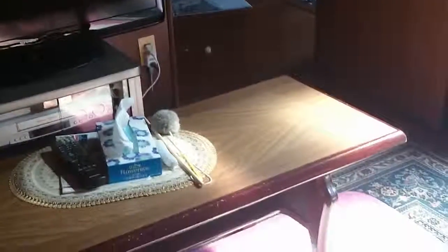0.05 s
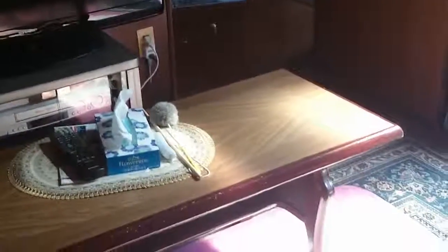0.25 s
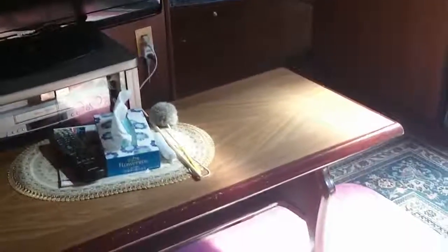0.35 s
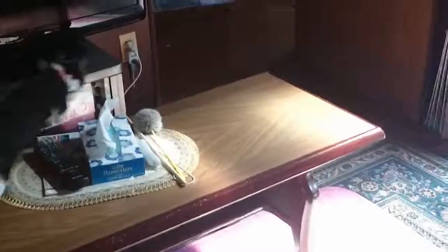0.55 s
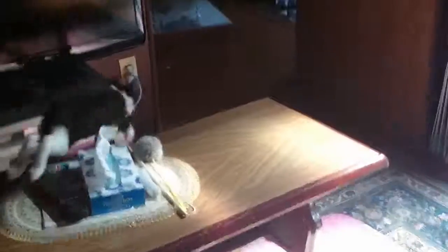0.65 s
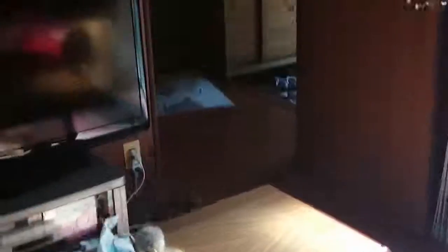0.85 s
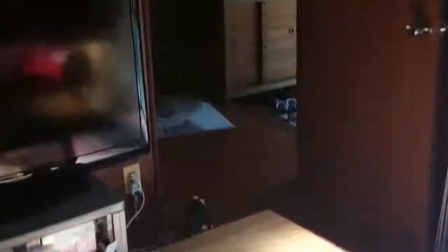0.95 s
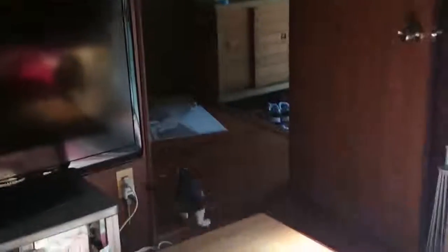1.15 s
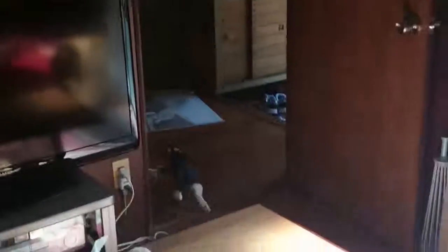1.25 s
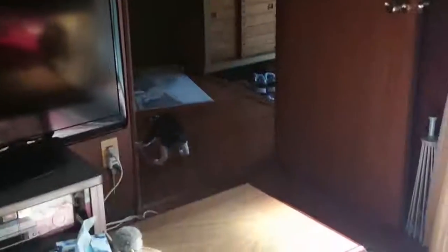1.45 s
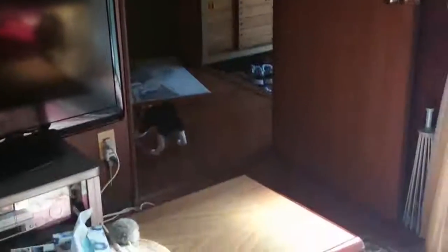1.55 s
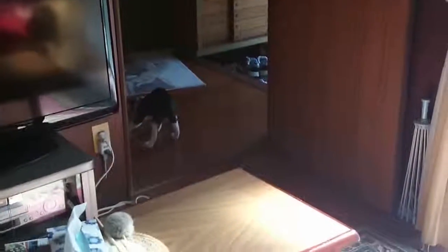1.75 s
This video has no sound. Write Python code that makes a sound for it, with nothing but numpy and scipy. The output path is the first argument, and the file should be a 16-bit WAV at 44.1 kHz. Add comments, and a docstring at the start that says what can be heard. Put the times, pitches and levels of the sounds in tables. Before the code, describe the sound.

A light ball bounces, then a cat thumps after it, collar bell jingling.

```python
"""Cat chasing a ball

A light hard ball cracks and bounces through a small wooden room, and the woodwork knocks dully.
A cat springs after it: a pellet rattles in its collar bell, its landings thump the hollow boards,
and its paws scuff as it pulls up. Beneath lie still air and a hand-held camera's rumble and bumps."""
import sys
import numpy as np
from scipy import signal
from scipy.fft import rfft, irfft, next_fast_len
from scipy.io import wavfile

SR = 44100
rng = np.random.default_rng(int(sys.argv[2]) if len(sys.argv) > 2 else 0)


def generate_wav(signal):
    """Clip the signal to [-1, 1] and save it as 16-bit WAV at the path in sys.argv[1]."""
    frames = np.transpose(np.atleast_2d(signal))
    scaled = np.clip(frames, -1, 1) * 32767
    pcm = np.round(scaled).astype(np.int16)
    wavfile.write(sys.argv[1], SR, pcm)


N = 79380


def amp(db):
    """Decibels to gain."""
    return 10 ** (np.asarray(db) / 20)


def unit(x):
    """Scale to rms 1."""
    return x / np.sqrt(np.mean(x ** 2) + 1e-20)


def unit_hit(x):
    """Scale to the energy of 10 ms at rms 1."""
    return x * np.sqrt(SR / 100 / (np.sum(x ** 2) + 1e-20))


def clock():
    """Seconds over the life of one event."""
    return np.arange(SR // 2) / SR


def fade(t, t60):
    """Decay that loses 60 dB in t60 seconds."""
    return np.exp(-np.log(1000) * t / t60)


def attack(t, rise_s):
    """Onset that eases up to full level."""
    return 1 - np.exp(-t / rise_s)


def along(points, hz):
    """Read a curve of (f, value) points on a log frequency axis."""
    f, values = np.transpose(points)
    return np.interp(np.log(hz + 1), np.log(f + 1), values)


def pan(db):
    """Left and right gains, the left louder by db."""
    return amp(np.array([[.5], [-.5]]) * db)


def add(track, s, x):
    """Mix x into the track at s seconds."""
    part = track[..., round(s * SR):][..., :x.shape[-1]]
    part += x[..., :part.shape[-1]]


def filtered(x, response):
    """Shape the spectrum of x by response(hz)."""
    n = x.shape[-1]
    size = 2 * next_fast_len(n // 2 + 4096)
    return irfft(rfft(x, size) * response(np.fft.rfftfreq(size, 1 / SR)), size)[..., :n]


def coloured(x, colour, tilt_db=0):
    """Minimum-phase EQ through (f/Hz, level/dB) points, tilted by tilt_db per octave."""
    def response(hz):
        octaves = np.log2(np.clip(hz, 150, 9000) / 1000)
        cepstrum = irfft(np.log(amp(along(colour, hz) + tilt_db * octaves)))
        half = len(cepstrum) // 2
        cepstrum[1:half] *= 2
        cepstrum[half + 1:] = 0
        return np.exp(rfft(cepstrum))
    return filtered(x, response)


def stereo(pair):
    """Spread two noises: alike in the bass, unrelated in the treble."""
    # stereo image: f/Hz, left-right likeness
    likeness = [(40, 1), (150, 0.76), (300, 0.75), (600, 0.32), (1200, 0.79), (3000, 0.03), (9000, 0)]
    def mid_side_gains(hz):
        angle = np.arccos(along(likeness, hz)) / 2
        return np.array([np.cos(angle), np.sin(angle)])
    mid, side = filtered(pair, mid_side_gains)
    return np.array([mid + side, mid - side])


def puffs(t60, rise_s):
    """Two independent noises that swell and die."""
    t = clock()
    return rng.standard_normal((2, len(t))) * fade(t, t60) * attack(t, rise_s)


def contact(t60, colour, tilt_db=0, rise_s=.0001):
    """The short stereo noise of two things meeting."""
    return unit_hit(coloured(stereo(puffs(t60, rise_s)), colour, tilt_db))


def in_room(x, room_db):
    """The direct sound plus the room's answer: a quick tail and a faint longer one."""
    # reverb decay: f/Hz, T60/s
    decay_times = [(100, 0.35), (400, 0.26), (1000, 0.3), (2000, .26), (4500, .24), (7000, 0.2),
                   (13000, 0.2), (15500, 0.072)]
    # reverb tone: f/Hz, level/dB
    colour = [(60, -0.5), (125, -9.5), (185, 4), (255, -5), (330, 1), (480, 0), (900, -0.5), (2000, 0.5),
              (5000, -1), (9000, 2.5), (13500, 3.5), (15500, 5)]
    t = clock()
    hz, s, spectra = signal.stft(rng.standard_normal((2, len(t))), SR, nperseg=256)
    t60 = along(decay_times, hz)[:, None]
    decay = fade(s, t60) + amp(-32) * fade(s, 2.64 * t60)
    _, wash = signal.istft(spectra * decay * amp(along(colour, hz))[:, None], SR, nperseg=256)
    tail = stereo(wash[:, :len(t)]) * attack(t, rise_s=.0021)
    tail /= np.sqrt(np.sum(tail ** 2) / 2)
    return x + amp(room_db) * signal.fftconvolve(np.atleast_2d(x), tail, axes=1)[:, :x.shape[-1]]


def room_air():
    """Still air lays a faint, steady bed of noise."""
    # room tone: f/Hz, level/dB
    colour = [(30, 4.5), (110, -9), (250, -3.5), (450, -1.5), (1000, -9.5), (3000, -14), (6000, -21),
              (13000, -25), (16000, -10)]
    return amp(-65) * unit(stereo(coloured(rng.standard_normal((2, N)), colour)))


def handling_rumble():
    """The hand on the camera makes a deep rumble that comes and goes."""
    # swells of the rumble: t/s, level/dB
    swells = [(0, -59), (.07, -75), (.15, -64), (.31, -60.5), (.47, -49.5), (.62, -60.5), (.74, -60.5),
              (.82, -51.5), (.88, -56.5), (1.02, -66), (1.06, -49.5), (1.3, -56), (1.47, -68.5),
              (1.8, -72.5)]
    # rumble tone: f/Hz, level/dB
    colour = [(5, -7.5), (12, 6.5), (25, -9.5), (50, -20.5), (100, -40), (300, -63), (900, -120)]
    rumble = unit(coloured(rng.standard_normal(N), colour))
    level_db = np.interp(np.arange(N) / SR, *np.transpose(swells)) + 2.5
    return amp(level_db) * rumble * pan(-6)


def scuffs():
    """A sliding paw is a swell of tiny slips."""
    # paw slides: t/s, level/dB, rise/s, T60/s
    slides = [(0.133, -58.5, 0.046, .25), (.375, -50, 0.022, 0.78), (.775, -54, 0.038, 0.23),
              (1.052, -42, .02, 0.041), (1.551, -50.5, 0.0089, 0.13), (1.565, -39, .012, 0.11),
              (1.6262, -38.5, 0.0012, 0.052), (1.74, -58.5, .03, 0.23)]
    # friction tone: f/Hz, level/dB
    colour = [(50, -22), (150, -2.5), (450, 1.5), (800, 5), (1400, 9.5), (2300, 11), (3300, 9), (4600, 7.5),
              (6500, -11), (10000, -9), (15000, -28)]
    out, t = np.zeros((2, N)), clock()
    grain_times = t[::64]
    for s, db, rise_s, t60 in slides:
        swell = puffs(t60, rise_s)
        grain_db = np.interp(t, grain_times, rng.normal(0, 2, len(grain_times)))
        scuff = unit_hit(coloured(stereo(swell * amp(grain_db)), colour))
        add(out, s, amp(db) * in_room(scuff, room_db=3.5))
    return out


def ball():
    """Each bounce is a dry crack with a brief ping, drawn out by the room."""
    # bounces: t/s, level/dB, tilt/(dB per octave), reverb/dB, ping f/Hz, ping over crack/dB
    bounces = [(.2381, -25.5, -1, 2, 5400, -5), (0.249, -28.5, -2.5, 2.5, 2830, -29),
               (0.2509, -30, 2.5, -1, 4170, 2), (0.2593, -40.5, -2.5, -3, 6140, 7.5),
               (.446, -55, -2, -1, 4380, -11), (0.5096, -36.5, -0.5, 0.5, 4030, -7),
               (0.6062, -40, 1.5, 0, 4540, 0.5), (0.6963, -54, -3, 4, 2400, -2),
               (.728, -57, -3.5, 9, 3100, -28), (.993, -57, 8, 5.5, 4400, -2),
               (1.3266, -42, -6, 4, 4700, -10), (1.3829, -44.5, 3.5, 4.5, 6400, -13)]
    # crack tone: f/Hz, level/dB
    colour = [(60, -41), (120, -22), (175, -17), (245, -12), (340, -6.5), (800, -4), (1150, -4), (1800, -1),
              (2800, 1), (4500, 4.5), (6500, -2.5), (8500, -9), (11000, -18), (13300, -12.5), (16000, -12)]
    out, t60 = np.zeros((2, N)), .02
    for s, db, tilt_db, room_db, ping_hz, ping_db in bounces:
        ping_peak = [(ping_hz * 2 ** (.32 * k), -8 * abs(k) ** 1.4) for k in range(-4, 5)]
        crack = contact(t60, colour, tilt_db)
        ping = amp(ping_db) * contact(t60, ping_peak)
        add(out, s, amp(db) * in_room(crack + ping, room_db))
    return out


def dull_knocks():
    """Dull low knocks of one note each: woodwork, plus two soft bumps of the hand on the camera."""
    # knocks, the two lowest being the hand: t/s, level/dB, f/Hz, T60/s
    knocks = [(.257, -46.5, 350, 0.13), (.266, -52, 164, 0.11), (.272, -45.5, 479, 0.1),
              (.41, -57, 404, 0.066), (0.436, -55.5, 487, 0.064), (.535, -56.5, 436, 0.064),
              (0.649, -64, 907, .08), (0.706, -56.5, 230, 0.092), (.735, -54.5, 174, 0.13),
              (.812, -52.5, 54.4, 0.088), (1.345, -45, 510, 0.06), (1.35, -52, 203, 0.054),
              (1.585, -54.5, 110, 0.034), (1.632, -50, 460.5, 0.15), (1.64, -55, 360, 0.094)]
    out, t = np.zeros((2, N)), clock()
    for s, db, hz, t60 in knocks:
        note = np.sin(2 * np.pi * hz * t) * fade(t, t60) * attack(t, rise_s=.0027)
        add(out, s, amp(db) * in_room(unit_hit(note), room_db=-6.5))
    return out


def bell_strike(upper_db, rattle_s):
    """The pellet hits the shell and rebounds ever more weakly, with ringing and bright chatter."""
    # shell modes, a close pair and a faint high one: f/Hz, level/dB, T60/s
    modes = [(8798, 1.5, 0.07), (9390, 0, 0.025), (13400, -23, .01)]
    # chatter tone: f/Hz, level/dB
    chatter_colour = [(500, -39), (6000, -29), (7900, -27.5), (8600, -3.5), (9550, -6), (10300, -14),
                      (12000, -24), (13100, -19), (14200, -34), (16000, -39)]
    rebounds_per_s, scatter_hz = 190, 70
    t = clock()
    rebounds = rng.random(len(t)) < rebounds_per_s / SR
    hits = rebounds * rng.standard_normal(len(t)) * amp(-5) * fade(t, rattle_s)
    hits[0] = 1  # the strike itself
    ring = np.zeros(len(t))
    for k, (hz, db, t60) in enumerate(modes):
        gain = amp(db + upper_db * (k == 1)) / np.sqrt(t60)
        ring += gain * np.sin(2 * np.pi * rng.normal(hz, scatter_hz) * t) * fade(t, t60)
    ring *= 1 - fade(t, .0034)  # soften the onset
    rattle = unit_hit(signal.fftconvolve(hits, ring)[:len(t)])
    return rattle + amp(-4) * contact(.07, chatter_colour)


def collar_bell():
    """The bell jingles with every bound; each strike starts with a metallic tick of its own loudness."""
    # pellet strikes: t/s, ring/dB, lift of the pair's upper mode/dB, tick/dB, rattle T60/s
    strikes = [(0.374, -55, -3, -48, 0.093), (0.3871, -49.5, -4, -42, 0.043), (.3967, -40, 5, -36, 0.23),
               (0.4448, -42.5, 1, -37.5, 0.11), (.459, -42, 1, -43, 0.056), (0.469, -48.5, -20, -53, .05),
               (0.4975, -33, -23, -38, 0.0083), (.5445, -43, -4, -44, 0.049), (0.552, -38.5, 4, -38, 0.073),
               (0.6009, -37.5, -6, -33, 0.032), (.612, -38, -16, -43, 0.024),
               (0.6204, -34.5, -31, -54, .04), (0.6452, -41, -6, -59, .05), (0.671, -43.5, -8, -53, 0.059),
               (.692, -45.5, 0, -54, .05), (0.7201, -41, -10, -49, 0.054), (.729, -35, 5, -44, 0.072),
               (0.739, -46, -29, -62, 0.059), (0.8114, -43.5, -16, -46, 0.063), (0.856, -36, 6, -53, 0.024),
               (.866, -48, -9, -44, 0.035), (0.975, -51.5, -3, -53, 0.055),
               (0.9949, -38.5, -25, -42.5, 0.22), (1.0118, -46.5, 3, -57, 0.023),
               (1.0857, -43.5, -10, -39, 0.16), (1.0982, -37.5, 2, -40, 0.31),
               (1.129, -39.5, -5, -36.5, 0.14), (1.143, -37, 6, -43, 0.041), (1.2216, -53, -4, -41, .02),
               (1.23, -41.5, 0, -47, 0.15), (1.2386, -38.5, -2, -46, 0.16), (1.256, -45, 18, -45, 0.072),
               (1.2937, -46, 16, -54, 0.2), (1.325, -60.5, 22, -36.5, .07), (1.331, -39, 1, -43, 0.059),
               (1.4189, -54.5, 10.5, -56, 0.087), (1.4315, -51, -2, -56, 0.26),
               (1.5174, -58, 5, -52.5, 0.14), (1.5419, -58, 7, -49.5, .08), (1.5721, -57, 10, -66, 0.11),
               (1.6105, -54, -3, -64, 0.089), (1.6409, -56, 3, -59, .08), (1.664, -68, 5, -50, 0.043)]
    # tick tone: f/Hz, level/dB
    tick_colour = [(500, -25), (4000, -16), (6600, -13.5), (8000, -11), (9000, 5), (9900, 1), (11000, -5),
                   (12000, -14), (13100, -5), (14800, -17), (16000, -1)]
    out = np.zeros((2, N))
    for s, db, upper_db, tick_db, rattle_s in strikes:
        jingle = amp(db) * bell_strike(upper_db, rattle_s)
        tick = amp(tick_db) * contact(.022, tick_colour, rise_s=.00094)
        add(out, s, in_room(jingle + tick, room_db=-2.5))
    out[0] = np.roll(out[0], shift=1)  # reaches the left one sample later
    return out * pan(-2)


def floorboards(tilt_db):
    """The floor rings in hollow modes, in a slightly new blend at each landing."""
    # floor modes: f/Hz, bandwidth/Hz, level/dB
    modes = [(89, 18, -8.5), (177.4, 39, -2), (206.8, 11.5, 4), (297.3, 15.5, 5), (360, 16, -6.5),
             (445.4, 17, 5.5), (510, 30, -7), (600, 100, -1), (606, 46, -7), (688.4, 12.7, 3.5),
             (833, 88, 8), (860, 34, 8.5)]
    t = clock()
    ring = np.zeros(len(t))
    for hz, width, db in modes:
        gain = amp(rng.normal(db, .79)) * np.sqrt(width) * (hz / 400) ** (tilt_db / 6)
        ring += gain * np.exp(-np.pi * width * t) * np.sin(2 * np.pi * (hz * t + rng.random()))
    return unit_hit(ring * attack(t, rise_s=.002))


def paws():
    """Soft pads thump and ring the boards, claws click, and the cat's weight flexes the joists."""
    # landings: t/s, thump/dB, claw/dB, thump tilt/(dB per octave), weight/dB
    landings = [(0.389, -57, -68, 0, -82), (0.433, -52, -69.5, -4.5, -70), (.648, -55, -71, 4.5, -57),
                (0.714, -56.5, -58, -1.5, -74), (1.0595, -27, -25, -2.5, -41),
                (1.0726, -28.5, -26.5, -1.5, -48), (1.098, -32.5, -63, -6, -53),
                (1.1588, -24.5, -46, -1.5, -46), (1.170, -29.5, -52, -2, -61),
                (1.187, -30.5, -49.5, 3, -38), (1.284, -44.5, -54, 2.5, -46),
                (1.3366, -37.5, -40.5, 6.5, -57)]
    # pad tone: f/Hz, level/dB
    pad_colour = [(40, -11), (90, -3.5), (135, -11), (195, 4.5), (255, -7.5), (310, -0.5), (450, 1),
                  (850, 1), (1100, -6.5), (1500, -8), (2100, -10.5), (4000, -21.5), (9000, -74)]
    # claw tone: f/Hz, level/dB
    claw_colour = [(100, 6), (500, -10), (1200, -12), (2600, 2), (3400, -2), (4800, 3), (6500, -11.5),
                   (8500, -22.5), (14000, -32)]
    joist_hz, load_s = 51.2, .0046  # a paw takes its load gradually
    out, t = np.zeros((2, N)), clock()
    joist = np.sin(2 * np.pi * joist_hz * t) * fade(t, t60=.16)
    for s, db, claw_db, tilt_db, weight_db in landings:
        boards = amp(-4) * floorboards(tilt_db)
        pad = in_room(contact(.046, pad_colour, tilt_db, rise_s=load_s), room_db=1)
        claw = in_room(contact(.025, claw_colour, rise_s=load_s), room_db=0)
        add(out, s, amp(db) * (pad + boards) + amp(claw_db) * claw + amp(weight_db) * joist)
    return out


def scene():
    """The chase, with one narrow band partly cancelled by the room, over air and rumble."""
    notch_hz, width_hz, notch_db = 249, 23.7, -5.5
    chase = ball() + paws() + dull_knocks() + scuffs() + collar_bell()
    chase = filtered(chase, lambda hz: amp(notch_db * np.exp(-((hz - notch_hz) / width_hz) ** 2)))
    return chase + room_air() + handling_rumble()


def record(dry):
    """Each of the two microphones has its own colour; the very top is cut steeply."""
    # microphone balance: f/Hz, left over right/dB
    balance = [(40, -6.5), (90, 6.5), (250, 3), (600, 2.5), (1300, 4.5), (2800, 6.5), (5000, 9),
               (6500, -8.5), (9000, -1), (15000, 1)]
    top_hz = 15200
    return filtered(dry, lambda hz: pan(along(balance, hz)) / (1 + (hz / top_hz) ** 120))


dry = scene()
out = record(dry)
generate_wav(out)
```